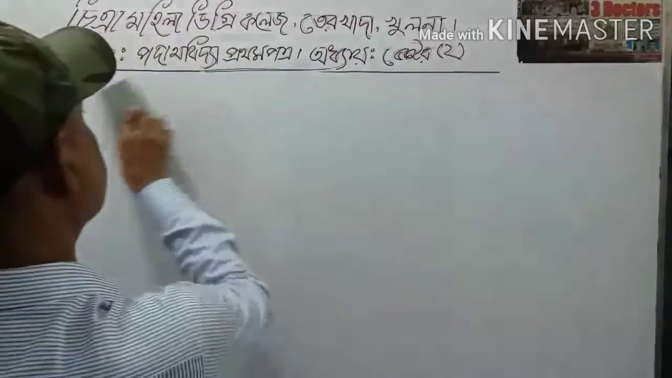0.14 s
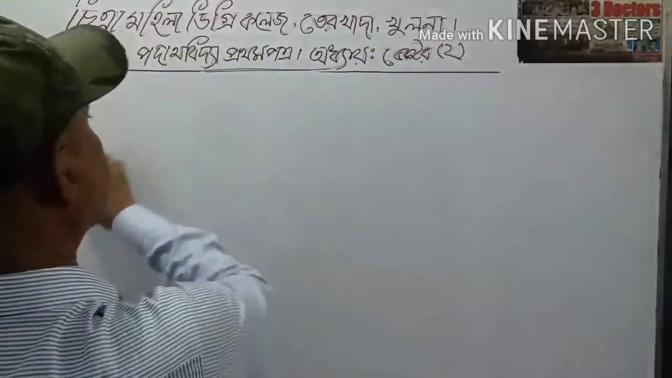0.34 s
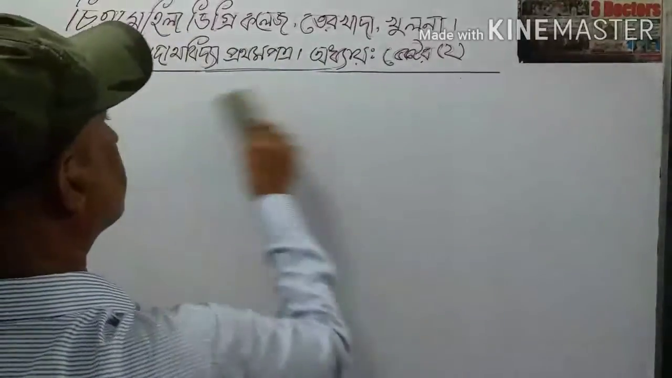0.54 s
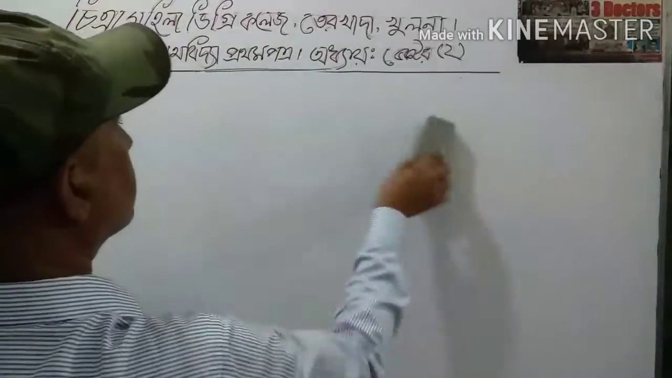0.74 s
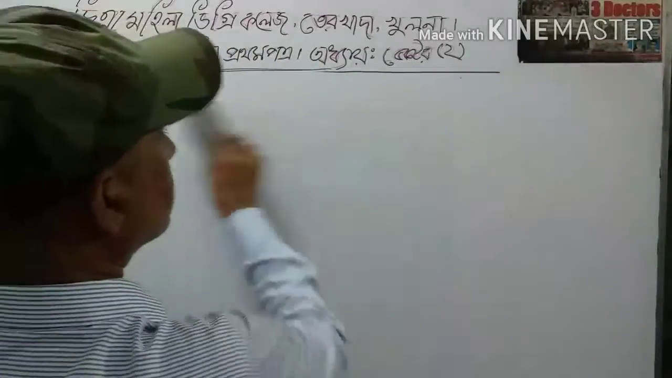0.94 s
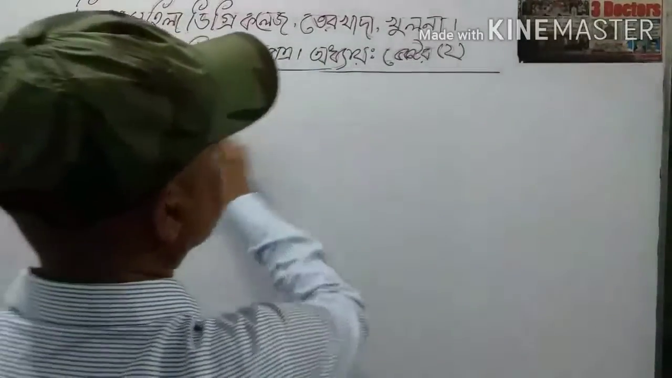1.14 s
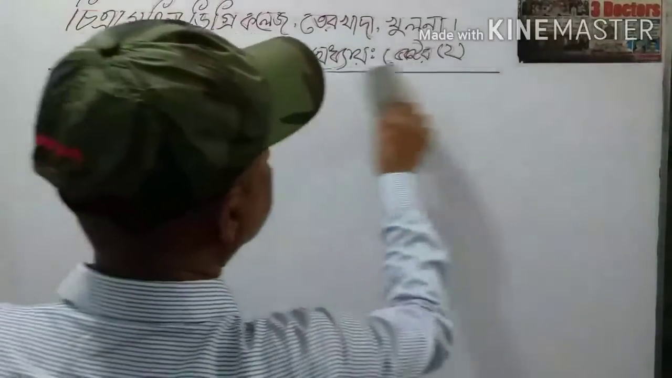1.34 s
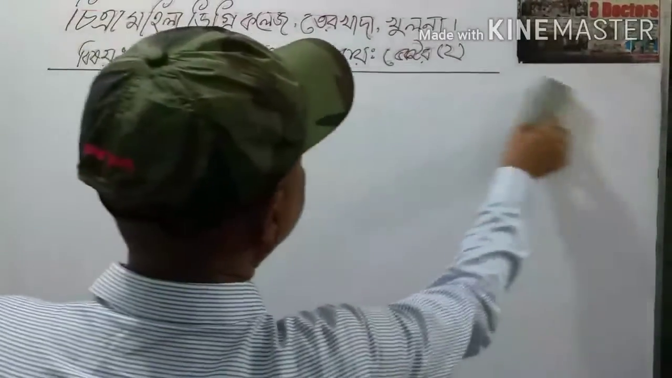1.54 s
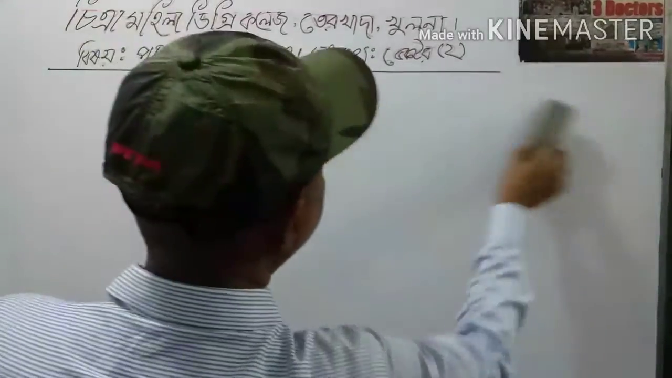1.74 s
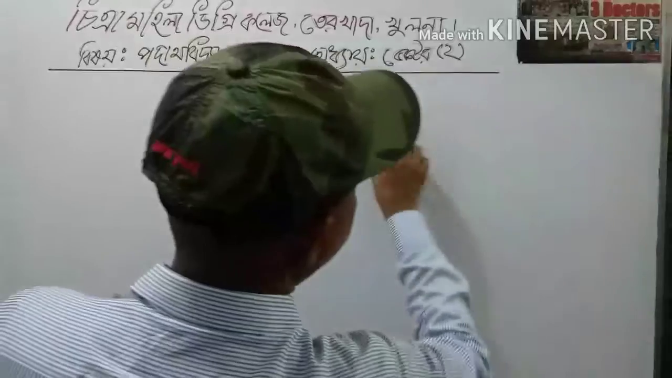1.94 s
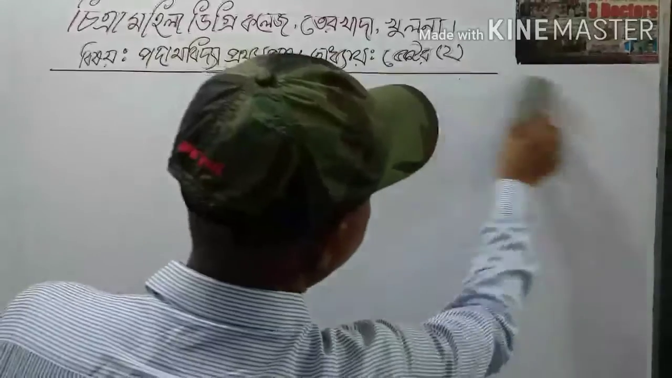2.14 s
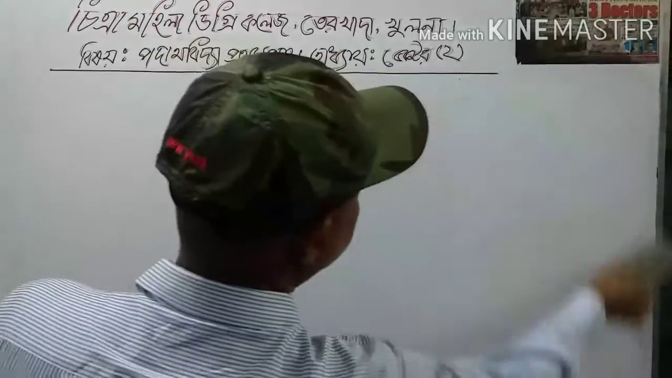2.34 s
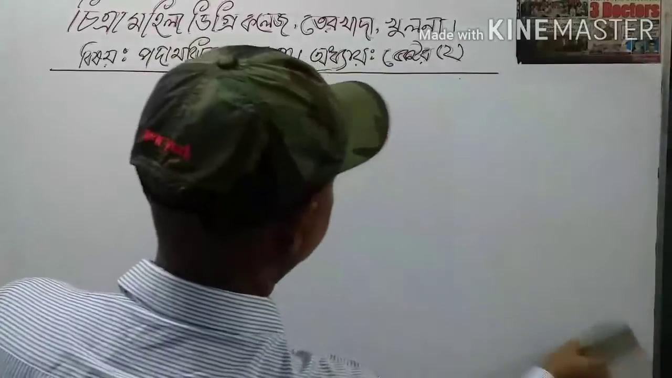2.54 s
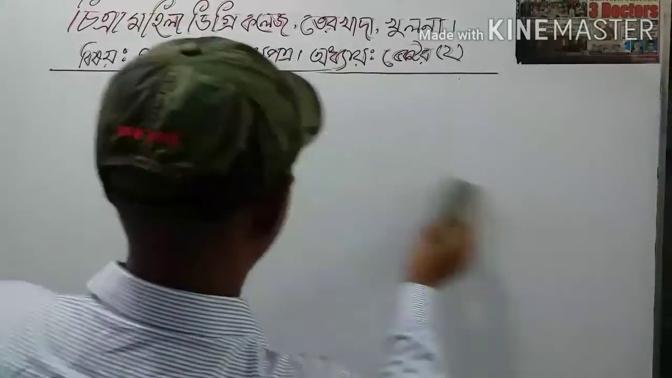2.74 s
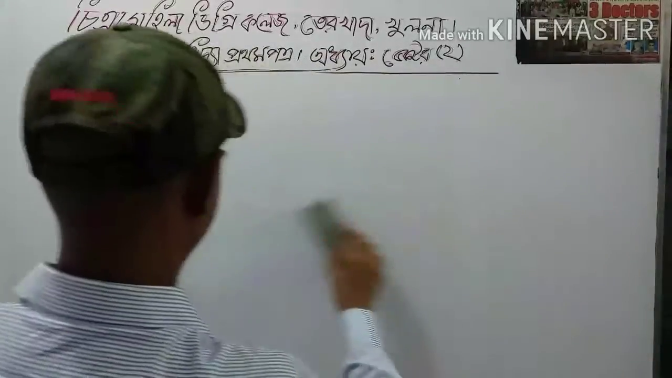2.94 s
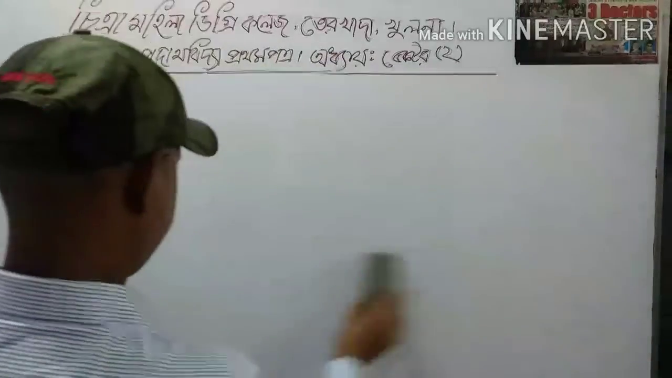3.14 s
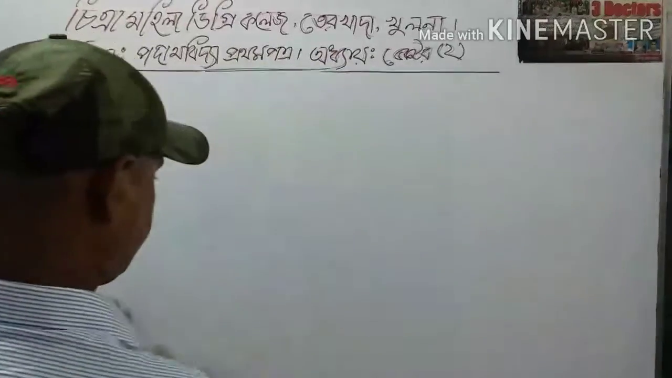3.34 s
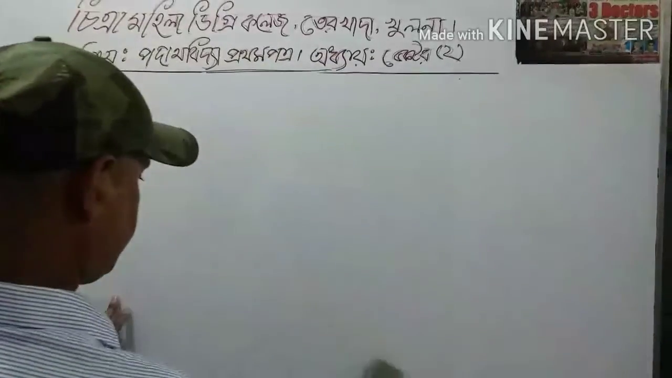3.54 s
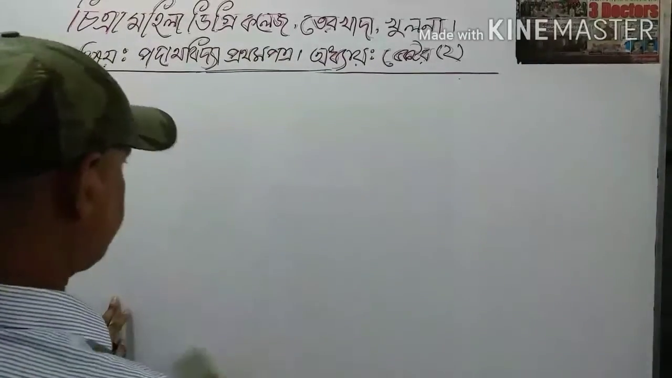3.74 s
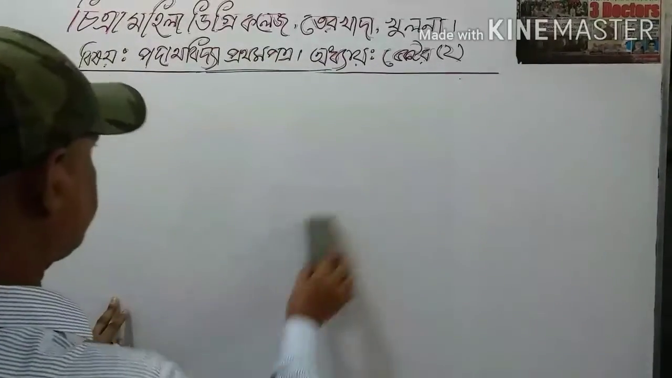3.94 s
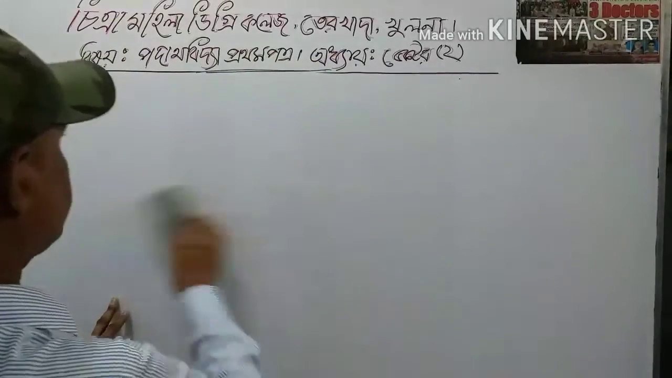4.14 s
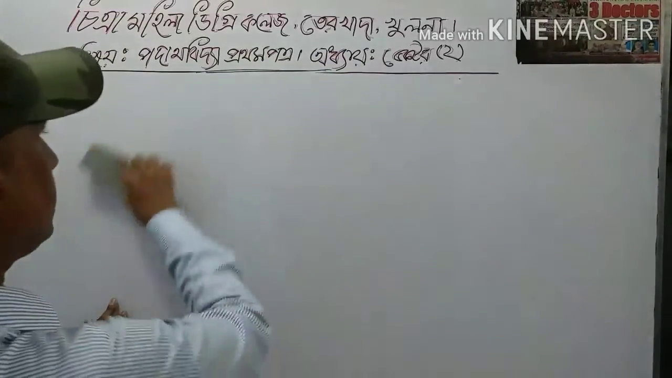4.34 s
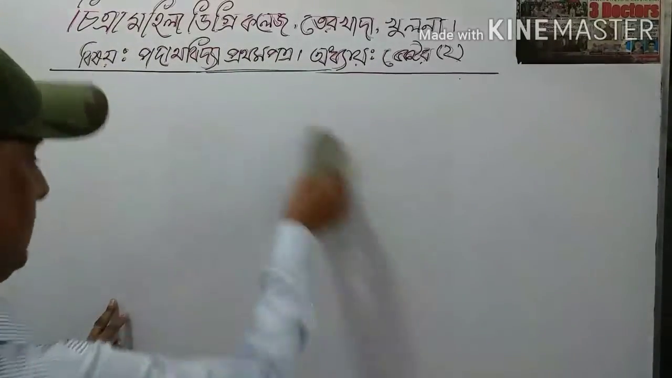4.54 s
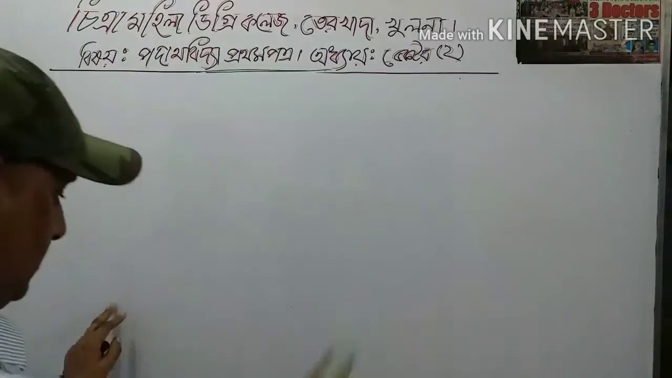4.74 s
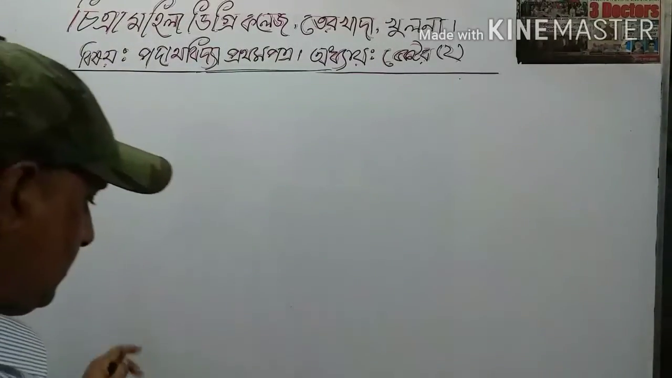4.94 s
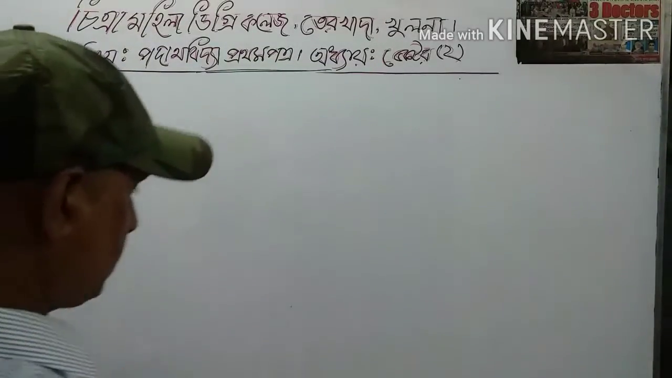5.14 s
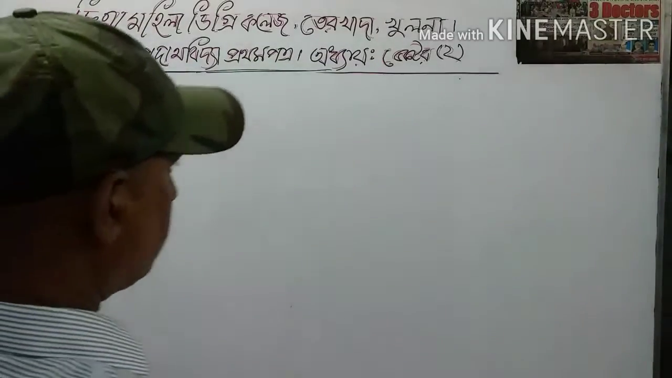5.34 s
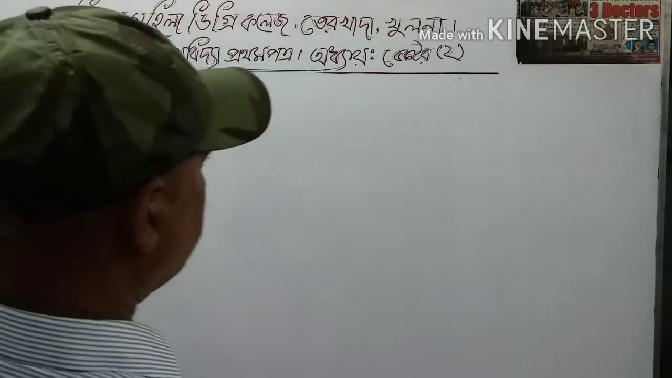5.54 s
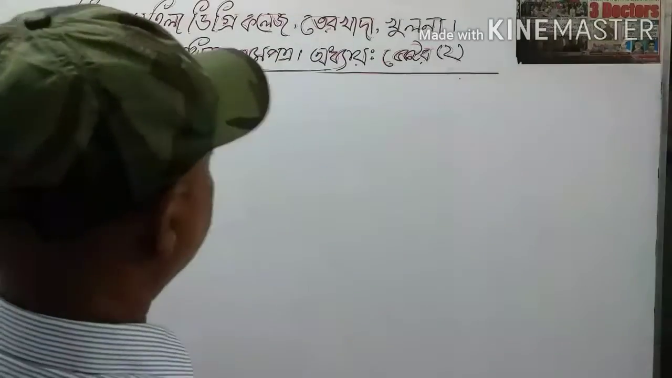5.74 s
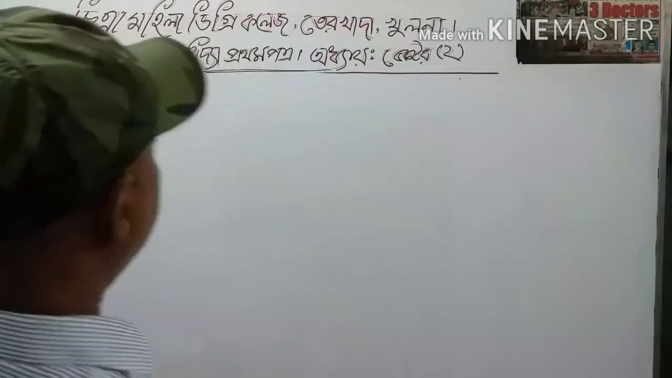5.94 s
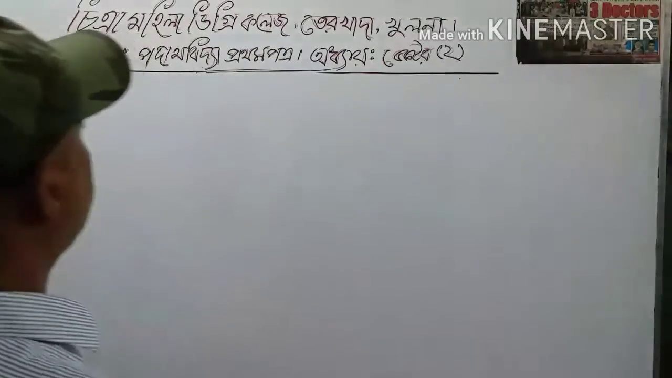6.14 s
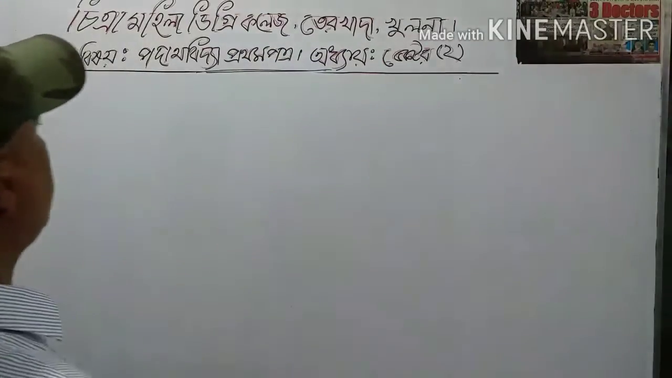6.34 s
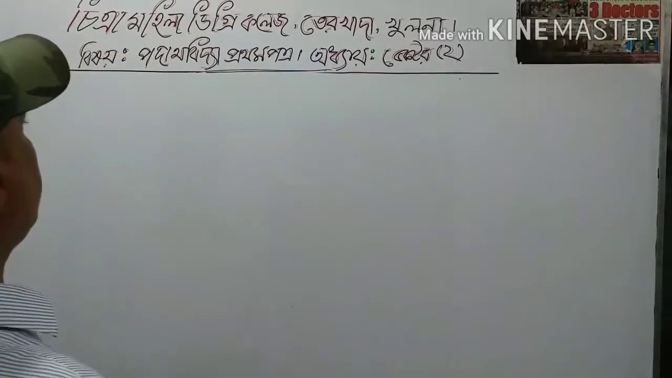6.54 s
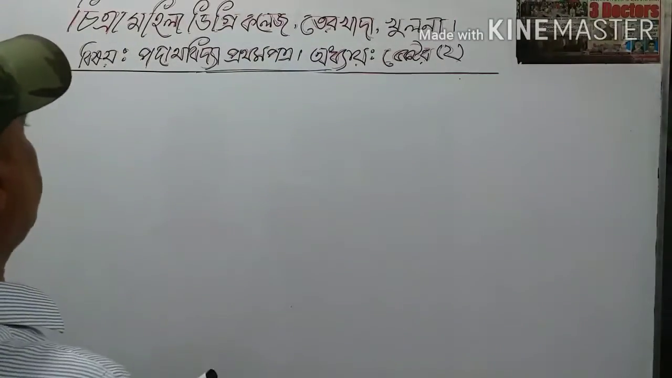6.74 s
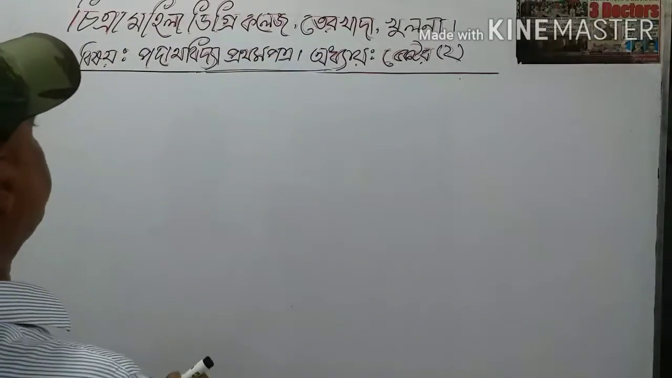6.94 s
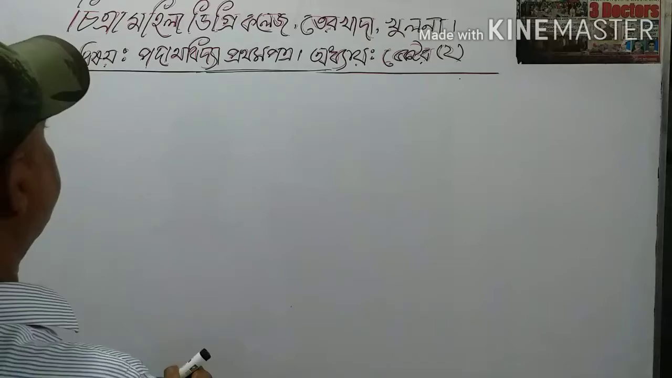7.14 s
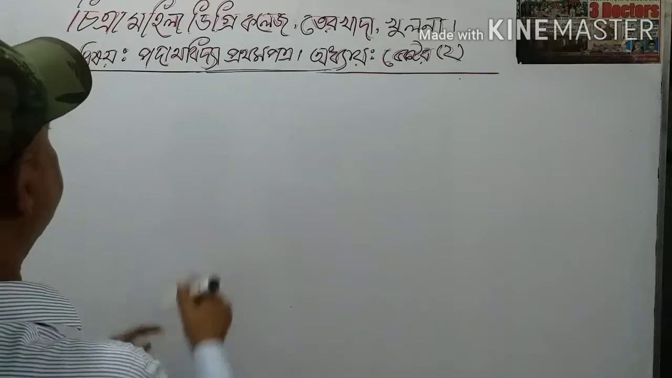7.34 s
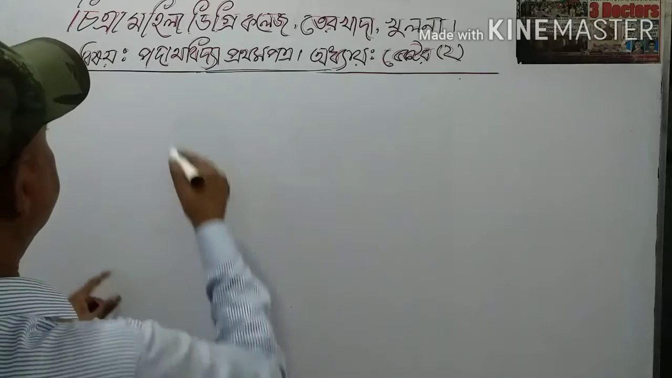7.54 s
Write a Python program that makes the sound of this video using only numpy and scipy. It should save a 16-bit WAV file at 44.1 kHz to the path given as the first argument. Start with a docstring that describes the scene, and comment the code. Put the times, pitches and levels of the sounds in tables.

```python
"""Whiteboard wiping and a marker cap

A felt eraser wipes a whiteboard in long and short strokes: noisy fibre slips in three speed-driven bands.
It drops on the ledge in two clattering knocks (panel modes, short cracks). A marker is picked up and
handled (gritty brushes, squeaks); its cap snaps off in three clicks with echoes and an air pop.
A fan hums in the bare, ringing classroom: shaped noise and two wavering tones."""
import sys
import numpy as np
from scipy import signal
from scipy.fft import rfft, irfft, next_fast_len
from scipy.io import wavfile
from scipy.ndimage import uniform_filter1d, map_coordinates

SR = 44100
rng = np.random.default_rng(int(sys.argv[2]) if len(sys.argv) > 2 else 0)


def unload_wav(signal):
    """Save mono or channel-first audio to the path in sys.argv[1] as 16-bit WAV at rate SR, clipped to [-1, 1]."""
    wavfile.write(
        sys.argv[1],
        SR,
        np.round(np.clip(np.atleast_2d(signal).T, -1, 1) * 32767).astype(np.int16),
    )


N = 335601
TIME_S = np.arange(N) / SR

# classroom decay: f/Hz, t60/s
ROOM_DECAY = [(120, 0.4), (500, 0.38), (2000, 0.49), (5000, 0.47), (9000, 0.38), (15000, 0.32)]
# fan air noise, relative spectrum: f/Hz, density/dB
FAN_AIR = [(25, -20), (42, -17), (60, -0.5), (110, -0.5), (165, -3.5), (230, -2.5), (360, -5.5),
           (460, -5.5), (650, -9), (1000, -26), (2000, -27.5), (5000, -26), (9000, -31.5), (15000, -27)]
# fan housing resonances: f/Hz, width/Hz, level/dB
FAN_HOUSING = [(90, 5.2, -8), (113.6, 11.8, -3.5), (202.9, 8.6, 0.5), (228.3, 11.2, 2), (248.7, 10.1, 0),
               (303.6, 5.2, -2), (326, 8.8, -5.5), (416.6, 11.6, -2), (425, 10.8, -5), (446.5, 15.3, -5)]
# fan motor hum, rms before wavering: f/Hz, level/dB
FAN_HUM = [(199.5, -62.5), (301, -77)]
# felt touching down, then sleeve and fingers brushing ledge, marker and cap:
# peak t/s, level/dB, rise/s, fall/s, centre f/Hz
SCUFF_EVENTS = [(3.712, -60, 0.004, 0.02, 2300), (4.474, -56, 0.004, 0.02, 9000),
                (4.89, -60, 0.01, 0.029, 5770), (5.09, -72, 0.023, 0.027, 5600),
                (5.665, -65.5, 0.011, 0.025, 7500), (5.81, -67.5, 0.054, 0.049, 6400),
                (6.005, -65.5, 0.048, 0.017, 4500), (6.475, -55.5, 0.0052, 0.028, 6000),
                (6.87, -69, 0.049, 0.048, 8650), (7.0, -66, 0.049, 0.21, 11000),
                (7.035, -59, 0.007, 0.0096, 10000), (7.357, -46.5, 0.021, 0.013, 3930),
                (7.36, -56, 0.01, 0.021, 1400), (7.58, -68.5, 0.18, 0.08, 9000)]
# hoarse squeaks of the slowing eraser and the marker in the hand:
# t/s, level/dB, half length/s, f/Hz, pitch jitter/share of f
SQUEAK_EVENTS = [(1.964, -71, 0.02, 1642, 0.092), (2.653, -68, 0.023, 1125, 0.088),
                 (3.086, -67, 0.018, 4360, 0.035), (4.902, -64.5, 0.02, 3620, 0.08),
                 (5.816, -61.5, 0.013, 4340, 0.04), (5.818, -75, 0.022, 6560, 0.04),
                 (6.68, -72, 0.058, 1770, 0.1)]
# cap slipping over its retaining ridge and coming free: t/s, level/dB
CAP_SNAPS = [(7.157, 2), (7.1577, -2.5), (7.1594, -2)]
# cap plastic and air cavity modes: f/Hz, width/Hz, level/dB
CAP_MODES = [(950, 110, -12), (1710, 170, -14.5), (2510, 240, -4.5), (2970, 120, -5.5), (3600, 76, 1),
             (4350, 290, -0.5), (5100, 350, -0.5), (5900, 230, -1.5), (6700, 250, 0.5), (7440, 510, 2.5),
             (8600, 600, -2.5), (10430, 920, -5), (14800, 2400, -12)]
# nearest surfaces throwing the snap back: delay/s, level/dB
SNAP_ECHOES = [(0.0066, -7.5), (0.0126, -12), (0.0172, -17), (0.0195, -31)]
# whiteboard panel modes: f/Hz, width/Hz, level/dB
PANEL_MODES = [(91, 18, -2.5), (138, 39, -4), (197, 37, 3), (273, 58, -2.5), (341, 67, -5.5),
               (567, 28, -12.5), (730, 16, -14.5)]
# eraser block on the ledge, relative spectrum: f/Hz, density/dB
BLOCK_CLACK = [(200, -12), (600, -5), (900, 4), (1300, -14), (1650, -10), (2050, 1), (2700, -2.5),
               (3800, -5), (5300, -3.5), (8000, -16), (15000, -26)]
# hand bumping the loose panel while wiping: t/s, thud level/dB
PANEL_BUMPS = [(1.729, -28), (1.764, -25), (1.964, -23.5), (2.04, -26.5)]
# eraser on the ledge, felt first, then hard back: t/s, thud level/dB, clack level/dB, tick level/dB
LEDGE_LANDINGS = [(5.177, -15.5, -23.5, -45), (5.327, -20.5, -21, -18)]
# rocking from corner to near edge to far end: delay/s, weight on panel/dB, contact hardness/dB
LANDING_ROCKS = [(0, -2.5, -3.5), (0.0045, -3, 0), (0.0072, -1, -5), (0.021, -3.5, -2.5),
                 (0.0282, -3, -6.5)]
# felt sliding on the board, relative spectrum: f/Hz, density/dB
FELT_SPECTRUM = [(350, -35), (600, -11), (854, -9.5), (1170, -3.5), (1360, -4), (1660, -2), (3020, -5.5),
                 (3650, 1), (5270, 2), (6200, -0.5), (8140, -1.5), (9190, -7.5), (10700, -3.5), (12600, -3),
                 (15400, -5.5)]
# eraser strokes, levels at full speed before the room's hold: start t/s, length/s, hiss level/dB,
# rasp over hiss/dB, sheen over hiss/dB, brightening from start to end/dB
ERASER_STROKES = [(-0.11, 0.49, -55.5, -1, -7.5, 6.5), (0.326, 0.18, -60.5, -1, -18, 1.0),
                  (0.448, 0.36, -56, -2.5, 3.5, -3), (1.189, 0.49, -54.5, -3.5, 1, -9.5),
                  (1.657, 0.14, -61, 2.5, -6, 0.0), (1.898, 0.16, -63, -4, -4, -0.5),
                  (2.054, 0.48, -54.5, -5.5, 0, -0.5), (2.602, 0.35, -54, -8.0, -1, 4.0),
                  (2.975, 0.19, -59.5, -10.5, 0, -1.5), (3.162, 0.23, -53, -9.5, 3.5, -4),
                  (3.421, 0.25, -57.5, -10, 4.5, -2.5), (3.673, 0.14, -47.5, -3.5, 5, 4),
                  (4.093, 0.169, -52.5, -10, 4, 4), (4.313, 0.2, -64.5, -9, -4.5, 0.0),
                  (4.422, 0.2, -52.5, -8.5, 4.5, -12)]

SPEED_UP_S, BRAKE_S = 0.22, 0.1  # ramp times; short strokes never reach full speed
HISS_POWER, RASP_POWER, SHEEN_POWER = 0.82, 1.28, 1.21  # band amplitude = speed ** power
LINGER_SHARE, LINGER_T60_S = 0.6, 0.49  # share of rubbing energy held by the room, and its decay
TOP_HZ = 15550  # microphone band limit


def amp(db):
    """Decibels to gain."""
    return 10 ** (np.asarray(db) / 20)


def unit(x):
    """Scale to rms 1."""
    return x / np.sqrt(np.mean(x ** 2) + 1e-20)


def along(points, hz):
    """(Hz, value) points read on a log axis."""
    f, v = np.transpose(points)
    return np.interp(np.log(hz + 1), np.log(f + 1), v)


def wobble(rate_hz):
    """Smooth random curve with rate_hz knots a second."""
    knots = rng.standard_normal(int(N * rate_hz / SR) + 4)
    return map_coordinates(knots, [TIME_S * rate_hz])


def filtered(x, response):
    """x times a complex response of frequency."""
    m = next_fast_len(N + SR // 2)
    hz = np.fft.rfftfreq(m, 1 / SR)
    return irfft(rfft(x, m) * response(hz), m)[:N]


def resonances(modes, hz):
    """Causal response of (Hz, width Hz, dB) modes with alternating signs."""
    total = 0
    for k, (centre_hz, width_hz, db) in enumerate(modes):
        damping = 1j * hz * width_hz
        total = total + (-1) ** k * amp(db) * damping / (centre_hz ** 2 - hz ** 2 + damping)
    return total


def ring(modes):
    """The modes' answer to one blow, energy 1."""
    h = irfft(resonances(modes, np.fft.rfftfreq(SR, 1 / SR)))
    h = h * (TIME_S[:SR] < .5)
    return h / np.linalg.norm(h)


def burst(spectrum, t60_s):
    """Short decaying crack of coloured noise, energy 1."""
    colour = amp(along(spectrum, np.fft.rfftfreq(SR, 1 / SR)))
    noise = irfft(rfft(rng.standard_normal(SR)) * colour)
    h = noise * amp(-60 * TIME_S[:SR] / t60_s)
    return h / np.linalg.norm(h)


def add(track, t_s, sound):
    """Mix a sound into the track at t_s."""
    part = track[round(t_s * SR):][:len(sound)]
    part += sound[:len(part)]


def swell(t_s, rise_s, fall_s):
    """Gaussian rise and fall, peak 1 at t_s."""
    return np.exp(-.5 * ((TIME_S - t_s) / np.where(TIME_S < t_s, rise_s, fall_s)) ** 2)


def slips(rate_hz, spread_db):
    """Dense tiny stick-slip releases of unequal size, rms 1."""
    hit = rng.random(N) < rate_hz / SR
    return unit(hit * rng.standard_normal(N) * amp(spread_db * rng.standard_normal(N)))


def classroom(x, wet_db, build_s=0.011):
    """Direct sound plus a diffuse tail building up as the walls answer; gain offsets the added energy."""
    hz, t, z = signal.stft(rng.standard_normal(SR), SR, nperseg=256)
    decay = amp(-60 * t / along(ROOM_DECAY, hz)[:, None])
    tail = signal.istft(z * decay, SR, nperseg=256)[1][:SR]
    tail = tail * (1 - np.exp(-(TIME_S[:SR] / build_s) ** 2))
    wet = signal.fftconvolve(x, tail / np.linalg.norm(tail))[:len(x)]
    return (x + amp(wet_db) * wet) / np.hypot(1, amp(wet_db))


def fan():
    """Air rushes through the resonant housing over a motor hum wavering in level and phase."""
    air = unit(filtered(rng.standard_normal(N), lambda hz: amp(along(FAN_AIR, hz))))
    drone = unit(filtered(rng.standard_normal(N), lambda hz: resonances(FAN_HOUSING, hz)))
    hum = np.zeros(N)
    for hz, db in FAN_HUM:
        level = amp(db + 0.71 * wobble(12))
        phase = 2 * np.pi * hz * TIME_S + 0.41 * wobble(2.95)
        hum += level * np.sqrt(2) * np.sin(phase)
    return amp(-65.0) * air + amp(-60.5) * drone + hum


def flexing(middle_s=1.92, half_s=0.14):
    """The hand leans on the loose middle of the panel, which rumbles softly: low modes fed by noise."""
    modes = [(55, 10, 1.7), (84, 27, -1), (130, 40, -2)]  # f/Hz, width/Hz, level/dB
    rumble = unit(filtered(rng.standard_normal(N), lambda hz: resonances(modes, hz)))
    return amp(-65) * swell(middle_s, half_s, half_s) * rumble


def handling():
    """Stick-slip grit through one broad resonance per brush; squeaks are tones of unsteady pitch."""
    grit = slips(rate_hz=6600, spread_db=4)
    out = np.zeros(N)
    for t_s, db, rise_s, fall_s, centre_hz in SCUFF_EVENTS:
        mode = [(centre_hz, centre_hz, 0)]  # as wide as its centre frequency
        brush = unit(filtered(grit, lambda hz: resonances(mode, hz)))
        out += amp(db) * swell(t_s, rise_s, fall_s) * brush
    for t_s, db, half_s, pitch_hz, jitter in SQUEAK_EVENTS:
        phase = 2 * np.pi * np.cumsum(pitch_hz * (1 + jitter * wobble(900))) / SR
        out += amp(db) * swell(t_s, half_s, half_s) * np.sqrt(2) * np.sin(phase)
    return classroom(out, wet_db=0)


def cap(pop_db=-19):
    """The cap snaps off in quick clicks, each ringing its plastic; air pops into the opening."""
    # spectra: f/Hz, density/dB
    crack = [(300, -11.5), (1400, -14), (3000, 3.5), (5000, 4.5), (8000, 2), (15000, -3.5)]
    scatter = [(100, -15), (8000, 4), (15000, 7.0)]
    air = [(50, -28), (120, -13), (200, 9), (400, 8), (700, -6), (1000, -9), (2000, -22)]
    out = np.zeros(N)
    for t_s, db in CAP_SNAPS:
        click = amp(db) * (ring(CAP_MODES) + 0.59 * burst(crack, t60_s=0.0051))
        add(out, t_s, classroom(click, wet_db=6, build_s=0.0068))
        for delay_s, echo_db in SNAP_ECHOES:  # uneven surfaces scatter each echo
            echo = signal.fftconvolve(click, burst(scatter, t60_s=0.0049))
            add(out, t_s + delay_s, amp(echo_db) * echo)
    pop = amp(pop_db) * burst(air, t60_s=0.024)
    add(out, CAP_SNAPS[0][0], classroom(pop, wet_db=11))
    return out


def thud(db):
    """One blow booms the panel; mode levels vary by blow, as each spot rings differently."""
    modes = np.array(PANEL_MODES) + np.outer(rng.normal(0, 1.6, len(PANEL_MODES)), [0, 0, 1])
    return classroom(amp(db) * ring(modes), wet_db=2)


def knocks():
    """Each contact booms the panel; those on the ledge add the block's clack and an edge tick."""
    edge = [(1500, -15), (6000, 2.0), (15000, -0.5)]  # f/Hz, density/dB
    out = np.zeros(N)
    for t_s, thud_db in PANEL_BUMPS:
        add(out, t_s, thud(thud_db))
    for t_s, thud_db, clack_db, tick_db in LEDGE_LANDINGS:
        for delay_s, weight_db, hard_db in LANDING_ROCKS:
            clack = amp(clack_db) * burst(BLOCK_CLACK, t60_s=0.0079)
            tick = amp(tick_db) * burst(edge, t60_s=0.0033)
            contact = amp(hard_db) * (clack + tick)
            add(out, t_s + delay_s, thud(thud_db + weight_db))
            add(out, t_s + delay_s, classroom(contact, wet_db=3.5, build_s=0.0055))
    return out


def roaming(x, patchy_db):
    """Moving source: its colour shifts in patches of frequency and time."""
    z = signal.stft(x, nperseg=1024)[2]
    field = uniform_filter1d(rng.standard_normal(z.shape), size=6, axis=0)
    field = uniform_filter1d(field, size=9, axis=1)
    return signal.istft(z * amp(patchy_db * unit(field)), nperseg=1024)[1][:N]


def lingering(energy):
    """Level of a noise of this energy when the room holds a share of it in exponential decay."""
    keep = amp(-120 / (LINGER_T60_S * SR))  # per sample; energy falls 60 dB in t60
    held = signal.lfilter([1 - keep], [1, -keep], energy)
    return np.sqrt((1 - LINGER_SHARE) * energy + LINGER_SHARE * held)


def ease(u):
    """Quarter-sine ramp from 0 to 1."""
    return np.sin(np.pi / 2 * np.clip(u, 0, 1))


def stroke_levels():
    """Hiss, rasp and sheen follow hand speed; easing the pressure trades hiss and rasp for sheen."""
    energy = np.zeros((3, N))
    for start_s, length_s, db, rasp_db, sheen_db, brighten_db in ERASER_STROKES:
        since_s = TIME_S - start_s
        speed = ease(since_s / SPEED_UP_S) * ease((start_s + length_s - TIME_S) / BRAKE_S)
        tilt_db = brighten_db / 2 * (np.clip(since_s / length_s, 0, 1) - .5)
        energy[0] += (amp(db - tilt_db) * speed ** HISS_POWER) ** 2
        energy[1] += (amp(db + rasp_db - tilt_db) * speed ** RASP_POWER) ** 2
        energy[2] += (amp(db + sheen_db + tilt_db) * speed ** SHEEN_POWER) ** 2
    return [lingering(band) for band in energy]


def wiping(rasp_hz=2800, sheen_hz=8800):
    """Felt fibres slip on the board: rasp below rasp_hz, hiss between, fine sheen above sheen_hz."""
    hiss_level, rasp_level, sheen_level = stroke_levels()
    fibres = slips(rate_hz=9000, spread_db=2) * amp(0.4 * wobble(70))
    diffuse = amp(3.5) * rng.standard_normal(N)  # walls smear the slips into a smooth wash
    rub = roaming(fibres + diffuse, patchy_db=1.67)

    def below(hz, edge_hz):
        return 1 / (1 + (hz / edge_hz) ** 12)

    def band(power_share):
        return unit(filtered(rub, lambda hz: amp(along(FELT_SPECTRUM, hz)) * np.sqrt(power_share(hz))))

    rasp = band(lambda hz: below(hz, rasp_hz))
    hiss = band(lambda hz: (1 - below(hz, rasp_hz)) * below(hz, sheen_hz))
    sheen = band(lambda hz: 1 - below(hz, sheen_hz))
    return hiss_level * hiss + rasp_level * rasp + sheen_level * sheen


def scene():
    """All sources summed at one microphone, the same in both channels."""
    mono = fan() + flexing() + handling() + cap() + knocks() + wiping()
    return np.array([mono, mono])


def record(dry, bass_hz=42):
    """The microphone sheds the deepest bass and keeps nothing from TOP_HZ up."""
    def response(hz):
        return hz ** 3 / np.hypot(hz ** 3, bass_hz ** 3) * (hz < TOP_HZ)

    return np.array([filtered(channel, response) for channel in dry])


dry = scene()
out = record(dry)
unload_wav(out)
```